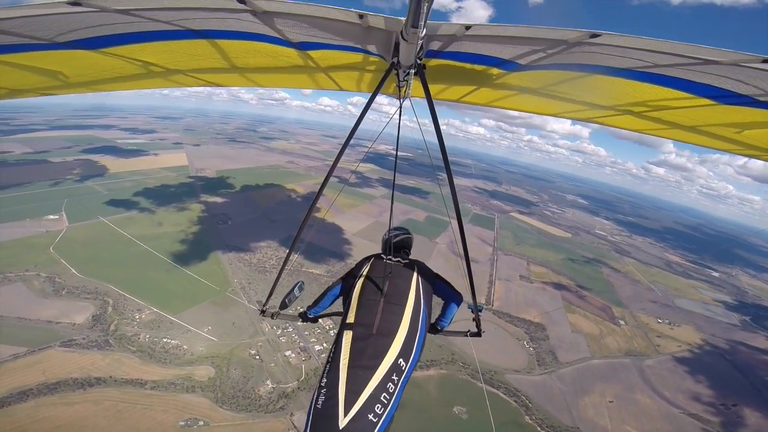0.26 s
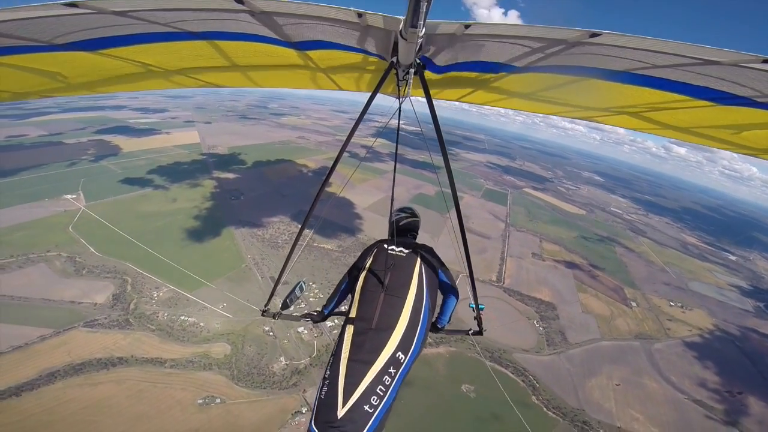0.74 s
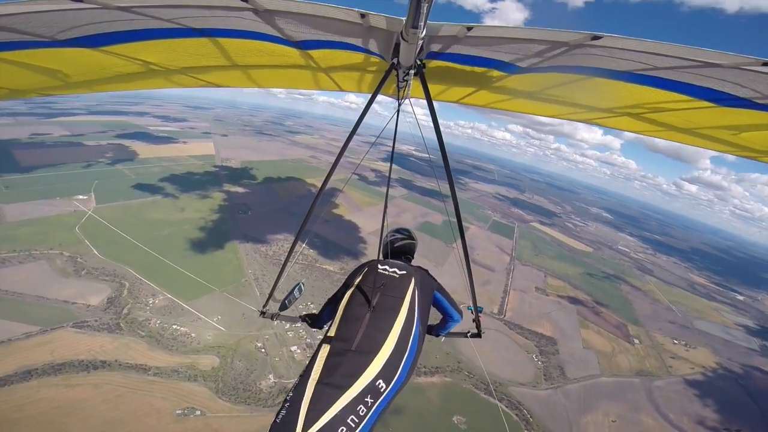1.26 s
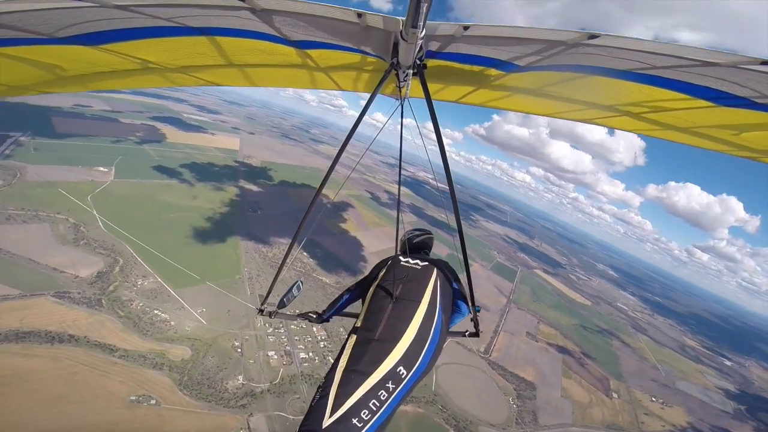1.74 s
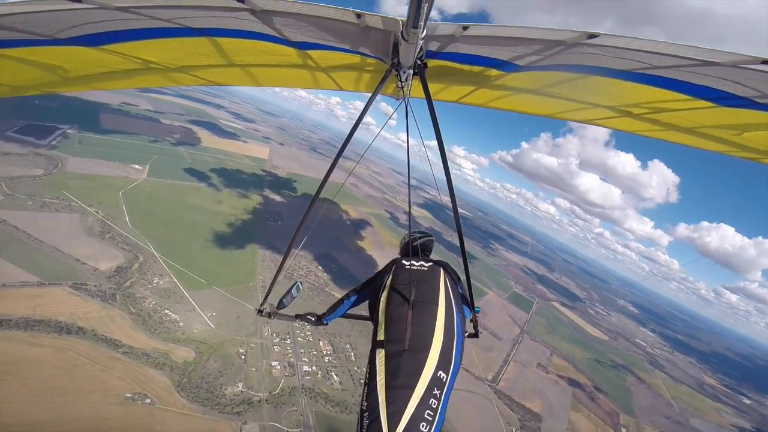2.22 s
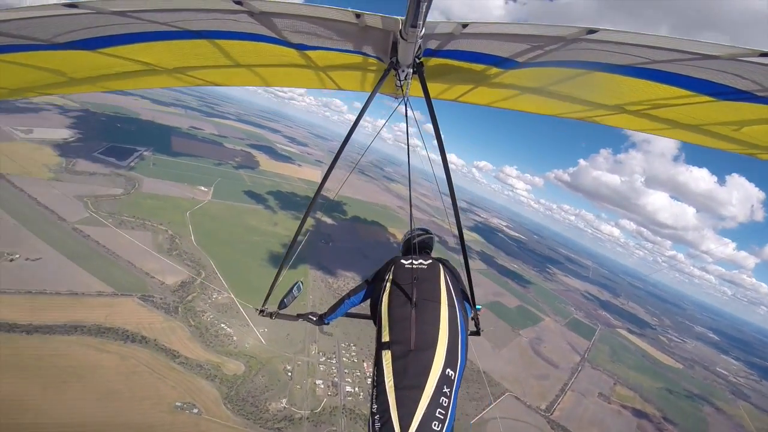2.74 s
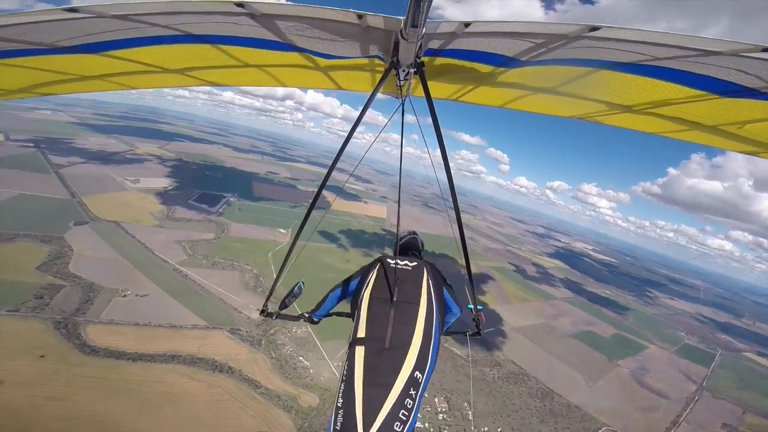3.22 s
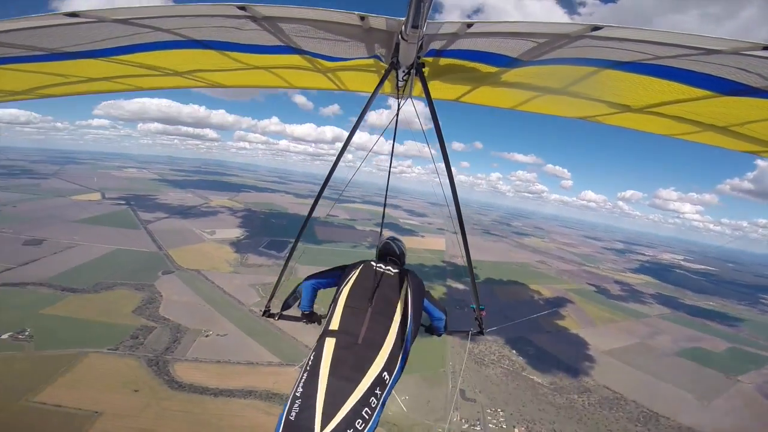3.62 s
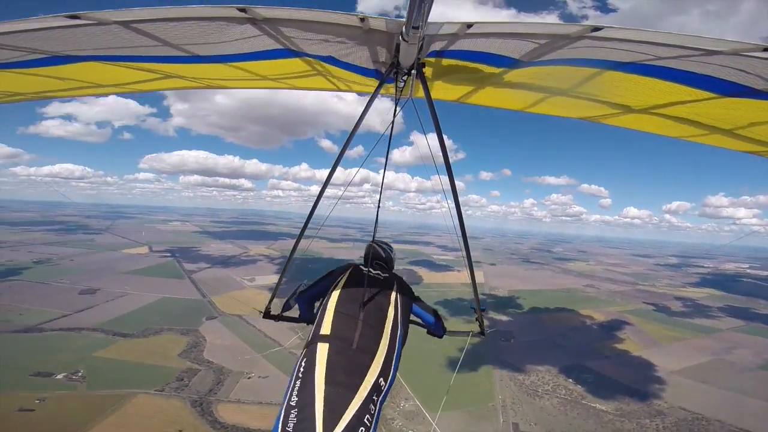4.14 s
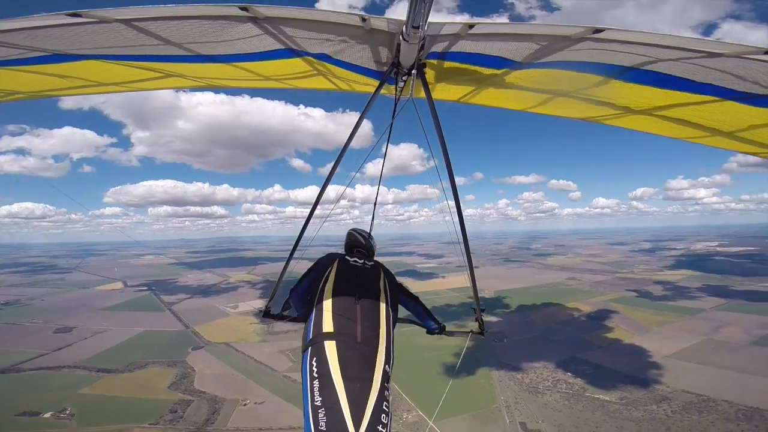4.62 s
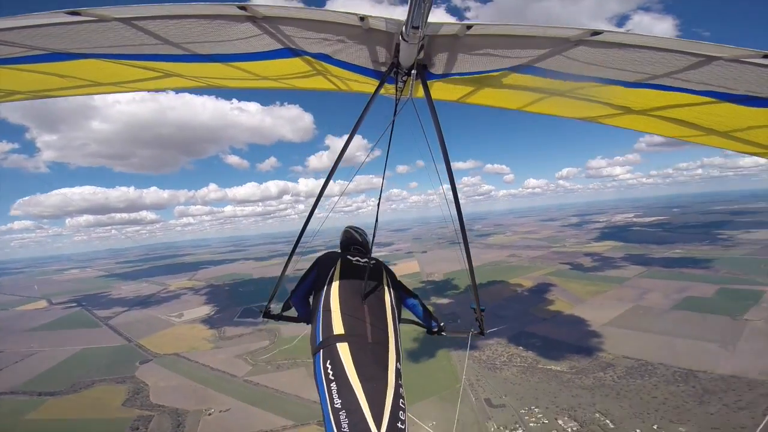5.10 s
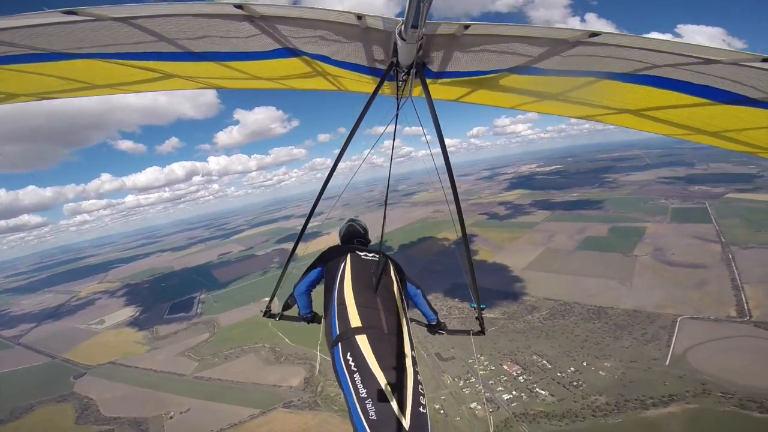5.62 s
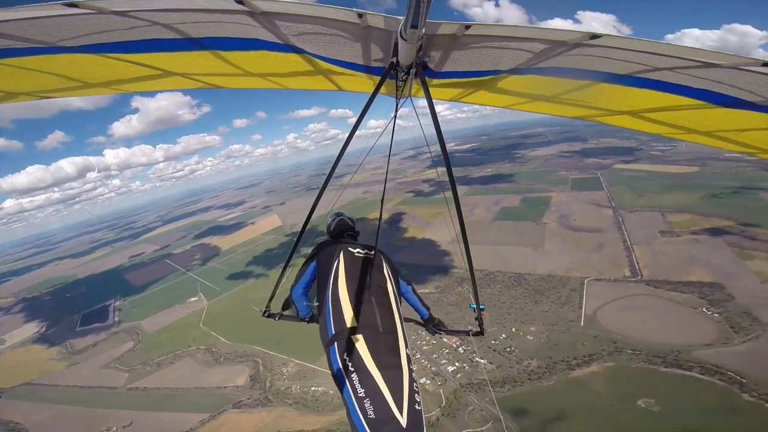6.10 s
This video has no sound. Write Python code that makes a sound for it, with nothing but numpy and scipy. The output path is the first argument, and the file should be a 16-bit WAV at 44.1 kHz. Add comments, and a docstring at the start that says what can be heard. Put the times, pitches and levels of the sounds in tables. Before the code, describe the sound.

Heavy low buffeting and ragged wind roar hit an exposed microphone, with sharp slaps, occasional clicks and a thin airy whistle behind.

```python
"""On the keel of a hang glider in a fast turn: air batters the port of a microphone on the frame.
Large eddies rumble and thump, smaller ones flutter, rush and hiss: shaped noise in quick bursts.
Heavy buffets push the port as single pulses; after most, the gain on the wind sound ducks briefly.
Small eddies slap the port as noise bursts, and sharp bright clicks fall on a few buffets.
Behind it all, rigging wires whistle as smeared tones, loudest in the middle of the turn."""
import sys
import numpy as np
from scipy import signal
from scipy.fft import rfft, irfft
from scipy.io import wavfile
from scipy.ndimage import uniform_filter1d, minimum_filter1d

SR = 44100
rng = np.random.default_rng(int(sys.argv[2]) if len(sys.argv) > 2 else 0)


def dump(signal):
    """Clip the signal to [-1, 1] and save it as 16-bit WAV at the path in sys.argv[1]."""
    limited = np.clip(np.atleast_2d(signal).T, -1, 1)
    pcm = np.round(limited * 32767).astype(np.int16)
    wavfile.write(sys.argv[1], SR, pcm)


N = 280476
TIME = np.arange(N) / SR  # s

# In the tables, "spread" is the standard deviation of a bell-shaped bump.
# airflow at the port, large eddies to small, before the swells:
# (t/s, rumble level/dB, flutter level/dB, rush level/dB, hiss level/dB)
AIRFLOW = [(0, -18, -19, -33.5, -49), (.61, -11, -17, -32.5, -52), (.8, -13, -18.5, -33.5, -48.5),
           (.94, -14.5, -18, -33.5, -51.5), (1.11, -14, -15.5, -33, -51), (1.18, -13, -14.5, -30, -47),
           (1.33, -13, -14, -32, -48.5), (1.43, -13, -17.5, -32, -48), (1.78, -16.5, -13.5, -29.5, -45.5),
           (2.17, -15.5, -19, -36, -53.5), (2.44, -14.5, -17.5, -32.5, -49.5), (2.6, -15, -18, -30.5, -47),
           (2.76, -18, -16, -31.5, -48), (2.89, -18, -15.5, -29, -46.5), (2.96, -15, -13.5, -32.5, -51),
           (3.33, -16.5, -16.5, -31.5, -52), (3.63, -14, -15.5, -28.5, -46.5),
           (4.08, -14.5, -15, -30.5, -51), (4.35, -14.5, -15.5, -28.5, -47), (4.8, -14.5, -19, -33, -53),
           (5.18, -14, -20.5, -34, -55), (5.36, -11.5, -17.5, -34.5, -56), (5.49, -18, -16, -34.5, -56),
           (5.8, -16, -19.5, -34.5, -57.5), (5.88, -15.5, -21.5, -37, -59),
           (6.16, -22.5, -23, -39.5, -56.5), (6.36, -14, -21.5, -35, -52.5)]
# thumps of the largest eddies: (t/s, rumble swell/dB, spread/ms)
THUMPS = [(.06, -4.5, 22), (.16, 4.5, 33), (.39, 2.5, 12), (.51, 3, 8.3), (.575, 0.5, 9.2), (.715, -7, 12),
          (.89, 2.5, 15), (1.38, 5, 16), (1.46, 4, 28), (1.57, 1, 15), (1.84, 0, 42), (1.95, 3, 56),
          (2.09, 2, 45), (2.28, 1, 30), (2.45, 3.5, 17), (2.55, 3, 19), (2.63, 9.5, 20), (2.76, 7, 47),
          (2.92, 10.5, 17), (3.12, 3.5, 24), (3.21, 10, 10), (3.31, 4, 25), (3.53, 1, 16), (3.68, 1, 37),
          (3.89, 7.5, 28), (4.02, 8, 21), (4.19, 11.5, 28), (4.33, 6, 18), (4.47, 9, 11), (4.61, -3, 11),
          (4.67, 4, 23), (4.92, 5, 18), (5.08, 6, 16), (5.28, 0.5, 34), (5.54, 13.5, 22), (5.64, 6, 46),
          (5.755, 7.5, 11), (5.96, 7.5, 36), (6.08, 4, 12), (6.14, 14.5, 11), (6.21, 6, 17)]
# lulls between the largest eddies: (t/s, drop of rumble and flutter/dB, spread/ms)
LULLS = [(.21, 3.5, 15), (.45, 1, 14), (.97, 3, 14), (1.11, 4, 12), (1.33, -0.5, 12), (1.745, 5, 8.5),
         (1.99, 4.5, 8.9), (2.18, 4.5, 16), (2.49, -0.5, 15), (2.84, -1, 11), (3.0, -1, 12),
         (3.06, 1.5, 13), (3.45, 5, 9.2), (3.93, -1.5, 18), (4.27, -0.5, 22), (4.58, 0, 10), (4.85, 3, 17),
         (5.12, 3.5, 12), (5.19, 3, 14), (5.59, 3, 8.5), (5.9, -0.5, 16)]
# lumps of flutter from middle-sized eddies: (t/s, swell/dB, spread/ms)
FLUTTER_LUMPS = [(.062, 5, 6.6), (.352, 2.5, 7.9), (.589, 7.5, 11), (.701, 3, 6.2), (1.148, 3, 7.8),
                 (1.384, 3, 5.1), (1.565, 1.5, 6.8), (1.934, 0, 8.3), (2.248, 5, 8), (2.278, 2, 7.4),
                 (2.54, 3.5, 8), (2.587, 2, 11), (2.681, 5, 7.3), (3.204, 3.5, 6.3), (3.324, 4, 7.2),
                 (3.522, 6, 8.6), (3.608, 4.5, 5.6), (3.813, 2, 6.1), (4.0, 2, 5.8), (4.113, 2.5, 8.2),
                 (4.312, 0, 13), (4.389, 3, 7.2), (4.501, 1, 11), (5.223, 2.5, 6.9), (5.41, 7.5, 11),
                 (5.497, 8, 5.8), (5.654, 4, 6.6), (5.945, 5, 8), (6.184, 7, 8)]
# spectra of the four scales of turbulence, shape only: (f/Hz, level per Hz/dB)
RUMBLE_SPECTRUM = [(5, -40.5), (11, -10), (18, -2), (42, 5.5), (70, 3.5), (115, 3), (160, -8), (240, -28.5),
                   (500, -68), (800, -70)]
FLUTTER_SPECTRUM = [(60, -8), (120, -0.5), (175, 0.5), (250, -4), (350, -8.5), (470, -12.5), (680, -18.5),
                    (950, -26), (1300, -37), (2000, -43.5), (3200, -55), (5000, -62), (10000, -92.5)]
RUSH_SPECTRUM = [(400, -3.5), (750, 7.5), (1000, 7), (1400, -2.5), (1680, -4.5), (2050, -2.5), (2550, -7),
                 (3250, -7.5), (4000, -17.5), (5200, -25), (7000, -26.5), (12000, -57)]
HISS_SPECTRUM = [(3000, -5.5), (4600, -2), (5700, -5.5), (6300, 0.5), (7300, -4), (8150, -6), (8600, 0),
                 (8950, -1.5), (9400, -11.5), (9800, -15.5), (10400, -14), (12300, -22), (13500, -27),
                 (15500, -28.5)]
# heavy buffets:
# (t/s, push/full scale ahead of the limiter, width/ms, duck of the wind sound's level after it/dB)
BUFFETS = [(.151, -0.66, 1.34, 2), (0.312, 0.53, 2.3, -0.5), (0.391, 0.67, 1.27, 3), (.505, -0.5, 2.2, 1.5),
           (0.519, 0.4, 0.92, 1.5), (0.812, 0.48, 1.5, 0), (0.989, -0.76, 0.53, 0.5), (.990, 1, 1.16, 9),
           (1.054, -0.55, 2.4, 3), (1.221, -0.6, 1.9, 2.5), (1.264, 0.72, 1.8, 3.5), (1.297, 0.67, 1.16, 2),
           (1.388, 0.42, 0.84, 3), (1.665, 0.76, 3, 2), (1.828, 0.77, 1.5, 1), (1.939, 0.63, 1.5, 1.5),
           (1.965, 0.82, 2.2, 2), (2.09, 0.74, 1.74, 1), (2.156, 0.43, 0.72, 0), (2.292, -0.38, 1.1, 4.5),
           (2.45, 0.8, 1.6, -0.5), (2.508, 0.39, 8.6, 2.5), (2.626, -0.97, 1.86, 4.5),
           (2.648, -0.073, 0.55, -0.5), (2.762, -.48, 2.2, 2.5), (2.806, 0.6, 1.1, 0.5),
           (2.923, 0.88, 1.55, 6), (3.039, 0.73, 1.5, 1), (3.121, -0.65, 2.9, 4), (3.329, 0.68, 2.6, 5.5),
           (3.408, -0.9, 1.5, 1.5), (3.53, 0.86, 3, 6), (3.663, -0.72, 3.4, 1.5), (3.714, -0.8, 2.8, 3.5),
           (3.825, -0.72, 1.17, 2.5), (3.888, 0.66, 3.4, 5), (4.024, -0.71, 1.8, 4.5),
           (4.173, 0.49, 6, 3.5), (4.208, -0.41, 3.7, 2.5), (4.399, 0.23, 0.58, 2), (4.592, 0.72, 3.6, 1),
           (4.647, -0.44, 2.3, -0.5), (4.746, 0.76, 1.4, -1.5), (4.789, 0.54, 1.2, -1.5),
           (4.829, 0.43, 0.86, 2), (4.925, 0.65, 2, 0.5), (5.099, -0.65, 4.1, 0), (5.282, -0.8, 3.6, 0),
           (5.367, 0.76, 1.24, 1.5), (5.398, -0.79, 1.2, 2), (5.429, -0.64, 1.15, 4),
           (5.461, -0.92, 2.1, 4.5), (5.536, -0.53, 1.44, 2), (5.56, -0.29, 1.1, 1), (5.635, -0.58, 2, 0),
           (5.765, -.48, 1.6, 3.5), (5.824, -0.84, 1.88, 6.5), (6.084, 0.71, 1.44, 1),
           (6.151, -0.6, 1.46, -1.5), (6.205, 0.68, 1.75, 3)]
# slaps of small fast eddies: (t/s, body level/dB, edge level/dB, spread/ms)
SLAPS = [(0.106, -14.5, -35, 2.2), (0.24, -17.5, -34, 3.3), (.343, -19, -31, 3.6), (0.551, -28, -36, 1.5),
         (0.601, -21, -46, 2.4), (.708, -16, -34, 1.9), (.889, -17, -31, 2.8), (.912, -16, -36, 1.5),
         (.925, -21, -32, 5.2), (0.955, -15, -38, 6.7), (0.988, -9, -27, 2.7), (1.384, -18, -45, 2.5),
         (1.563, -17, -36, 3.7), (1.709, -14, -27, 1.8), (1.924, -17, -44, 3.5), (2.087, -28, -33, 2.5),
         (2.154, -11.5, -35, 3.1), (2.294, -19, -36, 1.5), (2.629, -14, -33, 3.5), (2.717, -24, -32, 3.3),
         (2.87, -26.5, -37, 5), (2.908, -16, -32, 2.8), (2.92, -17, -35, 2), (3.015, -19, -41, 6.6),
         (3.204, -30, -44, 4.1), (3.259, -24, -34, 2.5), (3.325, -10.5, -30, 4.1), (3.527, -17, -37, 4),
         (3.819, -27, -24.5, 3.3), (3.916, -22, -41, 2.2), (4.014, -30, -32, 3), (4.174, -8.5, -39, 2.8),
         (4.244, -23, -35, 1.6), (4.326, -17, -42, 2.7), (4.504, -18, -46, 5.4), (4.79, -9.5, -39, 4.2),
         (4.83, -13, -29, 2.4), (5.001, -12, -31, 2.1), (5.243, -27, -36, 1.5), (5.32, -30, -34, 3),
         (5.348, -19, -35, 3.8), (5.368, -23, -44, 2.7), (5.408, -16, -37, 3.1), (5.466, -14, -37, 1.8),
         (5.498, -19.5, -45, 3.1), (5.559, -9, -33, 1.4), (5.624, -24, -39, 1.8), (5.653, -35, -43, 3.1),
         (5.725, -18, -40, 1.8), (5.767, -17, -40, 4.8), (6.024, -24, -46, 2.5), (6.081, -22, -38, 2.5),
         (6.143, -19, -38, 1.6), (6.2, -27, -39, 5)]
# sharp bright clicks, as from overload or a gain step, at a few buffets: (t/s, level/dB, spread/ms)
CLICKS = [(0.989, -37, 0.65), (2.924, -45, .7), (3.329, -47, .7), (5.464, -49, 1), (5.558, -51, .7),
          (5.823, -45, 0.94), (6.084, -48, .8)]
# spectra of a slap's body and edge and of a click, shape only: (f/Hz, level per Hz/dB)
SLAP_BODY_SPECTRUM = [(200, 7.5), (450, 1), (700, -7), (1050, -12), (1500, -39)]
SLAP_EDGE_SPECTRUM = [(900, 6.5), (1400, 5.5), (2200, 1), (3300, -23.5), (4500, -18.5), (8500, -25.5)]
CLICK_SPECTRUM = [(1050, -4), (4200, 1), (5500, 1), (9000, -13), (13000, -26), (15500, -21)]
# rigging wires through the turn; the thick pitch counts only relative to its weighted mean:
# (t/s, thick wires level/dB, thin wire level/dB, thick wire pitch f/Hz, thin wire pitch f/Hz)
WIRE_COURSE = [(0, -80.5, -90, 5700, 10300), (2.7, -67.5, -84, 5850, 10300), (2.9, -59, -83, 5940, 10400),
               (3.35, -61, -79, 5944, 10450), (3.42, -55.5, -79, 5960, 10450),
               (3.55, -60, -78, 6040, 10500), (3.7, -52, -70, 6085, 10600), (3.88, -50.5, -68, 6010, 10500),
               (4.0, -51.5, -72, 5950, 10350), (4.16, -50.5, -67, 5980, 10240),
               (4.35, -50.5, -68, 5946, 10540), (4.55, -49.5, -68, 5960, 10330),
               (4.82, -49, -75, 6000, 10500), (4.93, -55.5, -78, 6000, 10400),
               (5.12, -60, -79, 5970, 10400), (5.35, -63, -85, 5930, 10400), (5.6, -66.5, -94, 5840, 10300),
               (6.36, -78, -98, 5830, 10200)]
# whistles of the thick wires at mean pitch: (f/Hz, smear width f/Hz, level within the group/dB)
THICK_WIRES = [(4410, 1500, -3), (5120, 380, -5), (5560, 480, -6), (6040, 330, -0.5), (5970, 1100, 1),
               (7400, 1000, -11.5)]
# a slack wire whose whistle falls as the glider rolls out of the turn:
# (t/s, level/dB, pitch f/Hz before scaling by 0.97 and wavering)
SLACK_WIRE = [(2.8, -85, 7300), (3.08, -64, 7180), (3.36, -65, 6900), (3.52, -63, 6600), (3.68, -65, 6300),
              (3.85, -85, 6150)]

THUMP_FLUTTER_SHARE = 0.26  # share of a thump's swell that reaches the flutter
BUILD_S, BUILD_SHARE = 0.066, 0.18  # time constant of the build-up, and its share of the duck's depth
DUCK_RECOVERY_S = 0.16  # time constant
THIN_WIDTH_HZ, SLACK_WIDTH_HZ = 520, 320  # smear of the two single wires
TOP_HZ = 15100  # edge of the final low-pass


def wind(room, build_db):
    """Large eddies rumble; the smaller ones that they shed flutter, rush and hiss in the same quick bursts."""
    rumble_db, flutter_db, rush_db, hiss_db = curves(AIRFLOW)
    eddies, gusts = walk(58), walk(13.0)
    thump_db = swells(THUMPS)

    rumble_db = rumble_db + thump_db
    flutter_db = flutter_db + gusts + THUMP_FLUTTER_SHARE * thump_db + swells(FLUTTER_LUMPS)
    rush_db = rush_db + 0.66 * gusts + build_db
    hiss_db = hiss_db + 1.2 * gusts + 1.3 * build_db

    # smaller eddies add a faster flicker of their own
    flutter_swirl_db = 1.2 * eddies + 1.6 * walk(110)
    rush_swirl_db = eddies + 0.81 * walk(200)
    hiss_swirl_db = 0.64 * eddies + 0.6 * walk(200)

    rumble = turbulence(RUMBLE_SPECTRUM, 1.9 * eddies, even_s=0.047) * undb(rumble_db)
    flutter = turbulence(FLUTTER_SPECTRUM, flutter_swirl_db, even_s=0.071) * undb(flutter_db)
    rush = turbulence(RUSH_SPECTRUM, rush_swirl_db, even_s=0.078) * undb(rush_db)
    hiss = turbulence(HISS_SPECTRUM, hiss_swirl_db, even_s=0.13) * undb(hiss_db)

    # a heavy buffet takes the place of the other large eddies on the port
    low = (rumble + flutter) * room * undb(-swells(LULLS))
    return low + rush + hiss


def turbulence(spectrum, swirl_db, even_s):
    """Pressure noise that bursts with each eddy but keeps an even strength over longer stretches."""
    noise = colour(rng.standard_normal(N) * undb(swirl_db), spectrum)
    span = int(even_s * SR) + 1
    power = uniform_filter1d(uniform_filter1d(noise ** 2, span), span)
    return noise / np.sqrt(power + 1e-9)


def buffets():
    """Each heavy eddy is one push between two weaker pulls; returns them and the room left for other eddies."""
    pushes, room_db = np.zeros((2, N))
    for t, push, width_ms, _ in BUFFETS:
        near = np.abs(TIME - t) < .5
        u = (TIME[near] - t) * 1000 / width_ms  # time in pulse widths
        pushes[near] += push * (1 - 0.75 * u ** 2) * np.exp(-.5 * u ** 2)
        room_db[near] -= 8 * np.exp(-.25 * u ** 2)
    return pushes, undb(room_db)


def surges():
    """Rush builds towards a buffet, then the gain on the wind sound ducks from its crest and recovers.

    Returns both in dB; a negative depth in the table turns both the other way.
    """
    build_db, duck_db = np.zeros((2, N))
    for t, _, width_ms, depth_db in BUFFETS:
        near = np.abs(TIME - t) < 2
        age = TIME[near] - t
        past = np.clip(age * 1000 / width_ms, 0, 1)  # crossfade from build-up to duck
        build_db[near] += BUILD_SHARE * depth_db * (1 - past) * np.exp(-np.abs(age) / BUILD_S)
        duck_db[near] -= depth_db * past * np.exp(-np.abs(age) / DUCK_RECOVERY_S)
    return build_db, duck_db


def slaps(room):
    """Small fast eddies hit the port with a dull body, which yields to buffets, and a rough edge."""
    t, body_db, edge_db, spread_ms = np.transpose(SLAPS)
    body = bursts(t, body_db, spread_ms, SLAP_BODY_SPECTRUM)
    edge = bursts(t, edge_db, spread_ms, SLAP_EDGE_SPECTRUM)
    return room * body + edge


def clicks():
    """Very short bursts of bright noise at a few of the buffets, as from overload or a gain step."""
    t, level_db, spread_ms = np.transpose(CLICKS)
    return bursts(t, level_db, spread_ms, CLICK_SPECTRUM)


def bursts(times, levels_db, spreads_ms, spectrum):
    """Brief broad bursts of noise under bell-shaped envelopes."""
    envelope = np.zeros(N)
    for t, level_db, spread_ms in np.broadcast(times, levels_db, spreads_ms):
        near = np.abs(TIME - t) < .1
        u = (TIME[near] - t) * 1000 / spread_ms
        envelope[near] += undb(level_db) * np.exp(-.5 * u ** 2)
    return envelope * turbulence(spectrum, 0, even_s=0.0029)


def rigging():
    """Thick wires whistle together, each flaring on its own; a thin one sings above, a slack one slides down."""
    thick_db, thin_db, pitch_hz, thin_hz = curves(WIRE_COURSE)
    slack_db, slack_hz = curves(SLACK_WIRE)
    waver = 1 + 0.0058 * walk(5.5)
    # relative airspeed, averaging about 1 where the thick wires are loud
    airspeed = waver * pitch_hz / np.average(pitch_hz, weights=undb(thick_db))

    thick = np.zeros(N)
    for hz, width_hz, level_db in THICK_WIRES:
        flare_db = 1.1 * walk(9)
        thick += undb(level_db + flare_db) * whistle(hz * airspeed, width_hz)
    thick = unit(thick)
    thin = whistle(thin_hz, THIN_WIDTH_HZ) * undb(1.6 * walk(12))
    slack = whistle(0.97 * slack_hz * waver, SLACK_WIDTH_HZ)

    wires = thick * undb(thick_db) + thin * undb(thin_db) + slack * undb(slack_db)
    flicker_db = .7 * walk(14)
    return wires * undb(flicker_db)


def whistle(pitch_hz, width_hz):
    """A wire sheds vortices at a pitch set by the airspeed; rough air smears the note to a narrow hiss."""
    smear = walk(width_hz / 2) + 1j * walk(width_hz / 2)
    return np.real(smear * np.exp(2j * np.pi * np.cumsum(pitch_hz) / SR))


def swells(table):
    """Sum of smooth bumps in dB from rows of (t/s, swell/dB, spread/ms)."""
    total_db = np.zeros(N)
    for t, swell_db, spread_ms in table:
        total_db += swell_db * np.exp(-.5 * ((TIME - t) * 1000 / spread_ms) ** 2)
    return total_db


def curves(table):
    """The columns of a table after the first, joined by straight lines in time."""
    t, *columns = np.transpose(table)
    return [np.interp(TIME, t, column) for column in columns]


def walk(rate):
    """Smooth random drift of rms 1 that changes up to about rate times a second."""
    bins = np.arange(N // 2 + 1) * SR / N
    return unit(irfft(rfft(rng.standard_normal(N)) * np.exp(-.5 * (bins / rate) ** 2), N))


def colour(x, spectrum):
    """Filter by (f/Hz, level/dB) points, silent above the last; rms 1."""
    hz, level_db = np.transpose(spectrum)
    bins = np.arange(N // 2 + 1) * SR / N
    gain_db = np.interp(np.log(bins + 1), np.log(hz), level_db, right=-np.inf)
    return unit(irfft(rfft(x) * undb(gain_db), N))


def unit(x):
    """Scale to rms 1."""
    return x / np.sqrt(np.mean(x ** 2))


def undb(db):
    """Decibels to gain."""
    return 10 ** (np.asarray(db) / 20)


def scene():
    """Wind broken by heavy buffets, slaps and clicks, with the wires behind."""
    pushes, room = buffets()
    build_db, duck_db = surges()
    ducked_wind = wind(room, build_db) * undb(duck_db)
    return (ducked_wind + pushes + slaps(room) + clicks() + rigging())[None]


def record(dry):
    """A look-ahead limiter holds the peaks under full scale, the ends are eased, and the top is cut."""
    ceiling = .95
    need = np.minimum(1, ceiling / (np.abs(dry) + 1e-9))
    gain = uniform_filter1d(minimum_filter1d(need, size=221), size=221)  # windows of 5 ms
    fade = np.minimum(1, np.minimum(TIME, TIME[-1] - TIME) / .003)
    low_pass = signal.ellip(8, .2, 70, TOP_HZ, fs=SR, output="sos")
    return signal.sosfilt(low_pass, dry * gain * fade)


dry = scene()
out = record(dry)
dump(out)
```